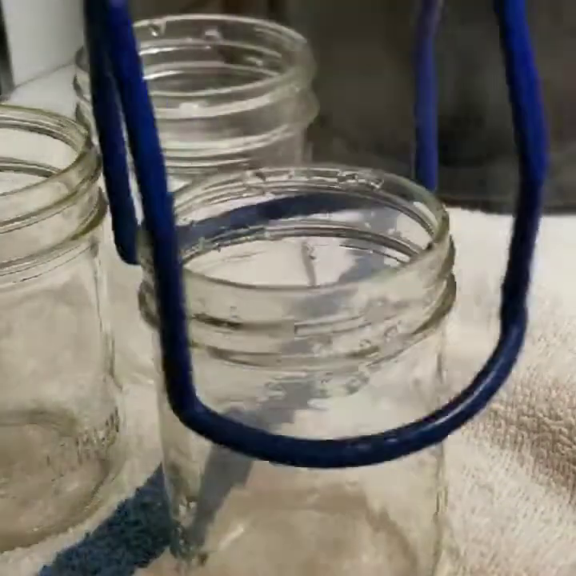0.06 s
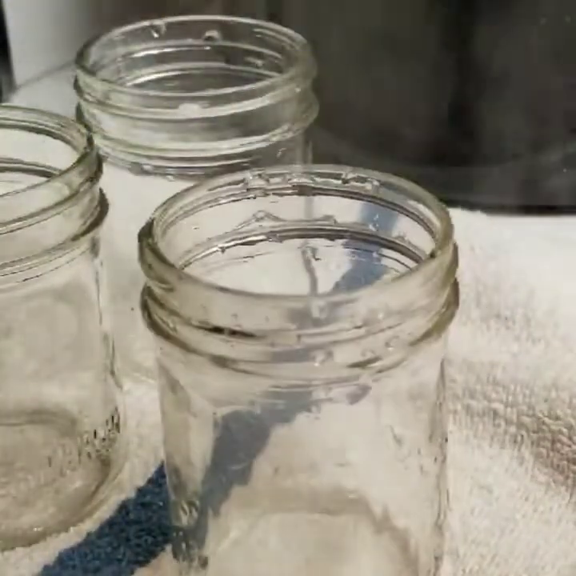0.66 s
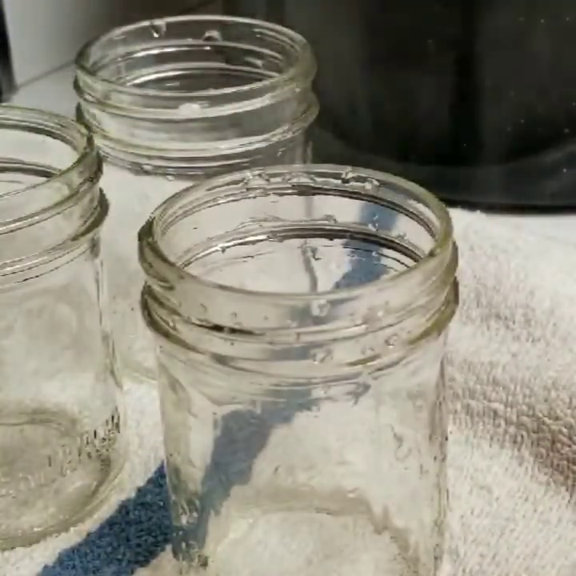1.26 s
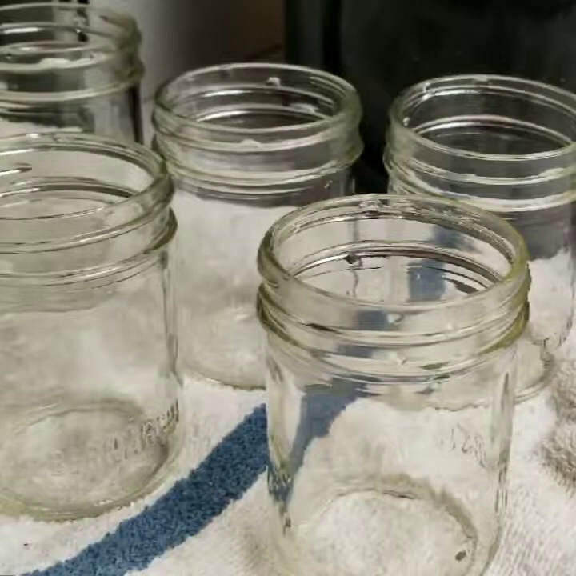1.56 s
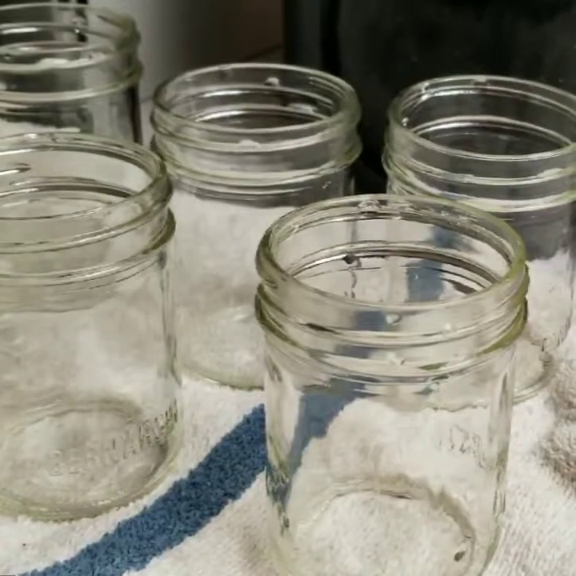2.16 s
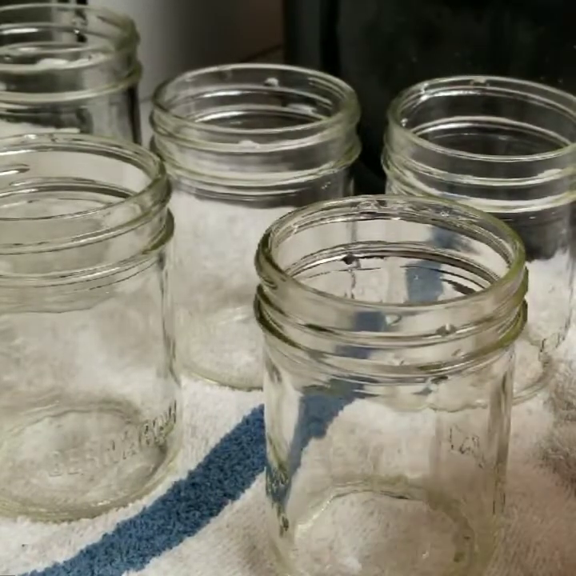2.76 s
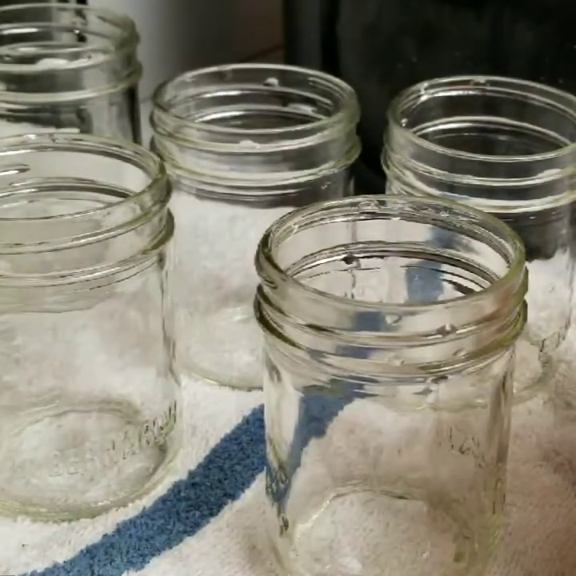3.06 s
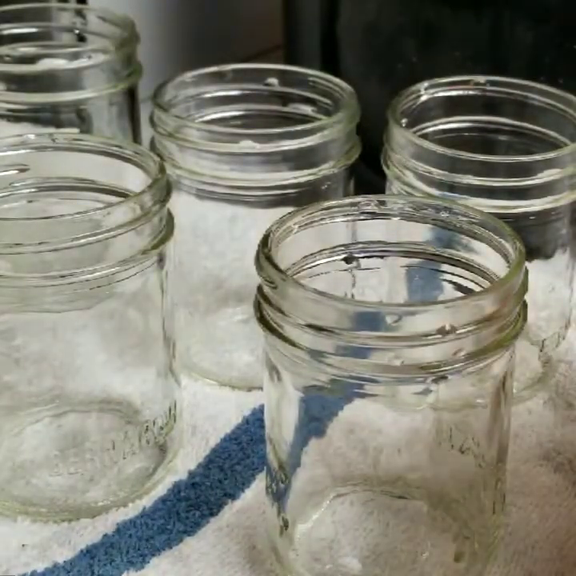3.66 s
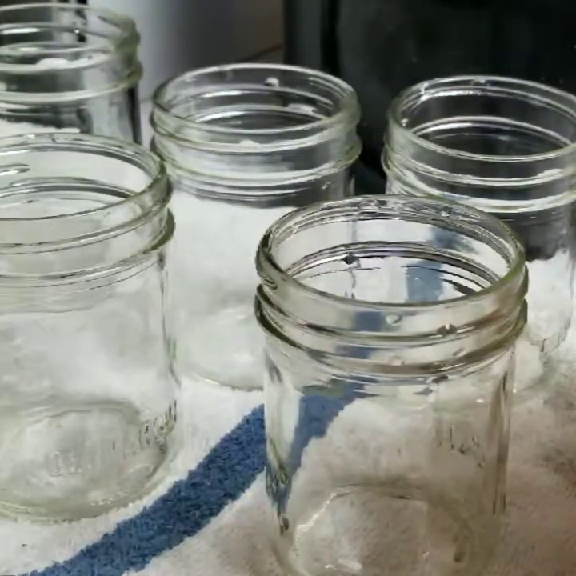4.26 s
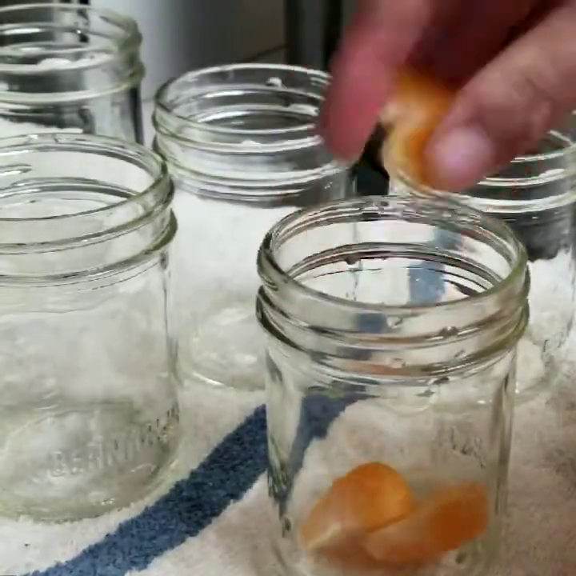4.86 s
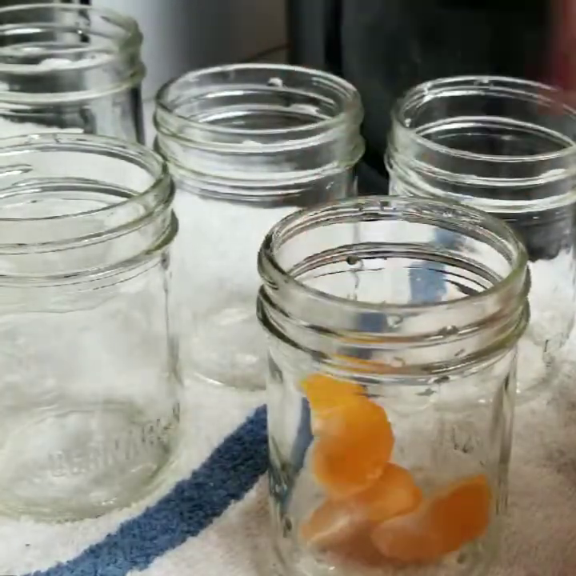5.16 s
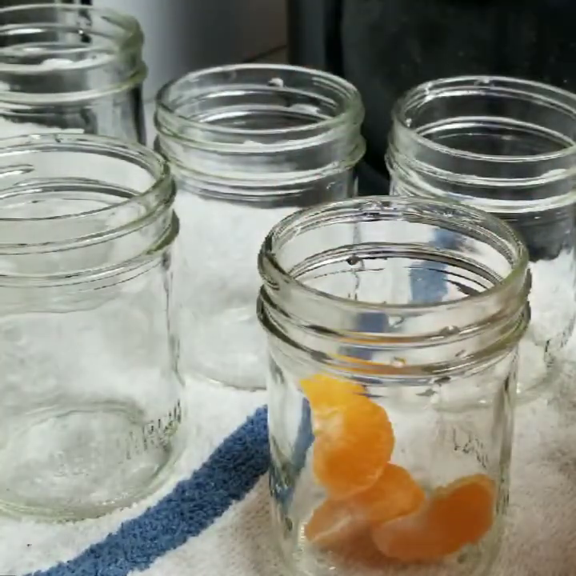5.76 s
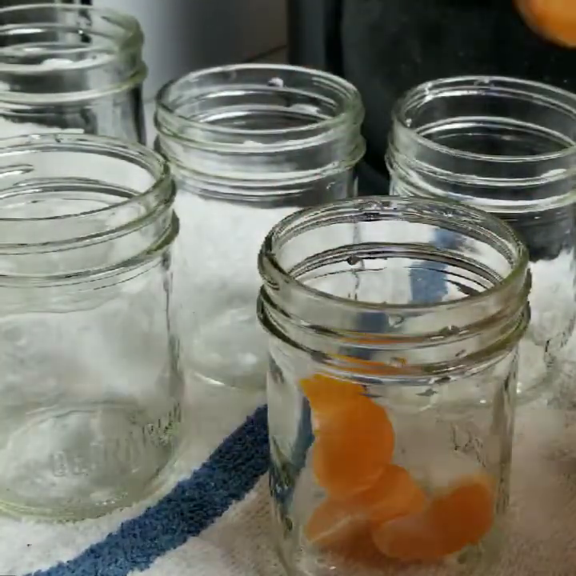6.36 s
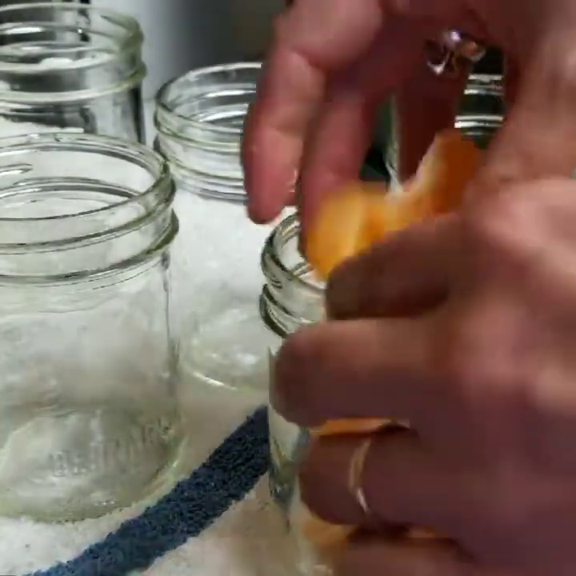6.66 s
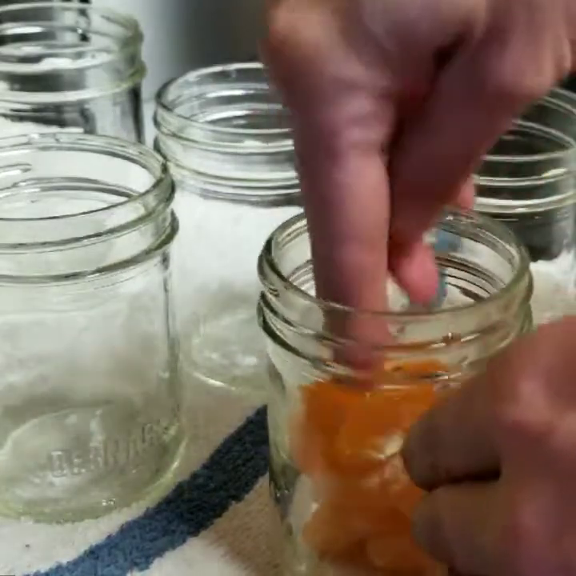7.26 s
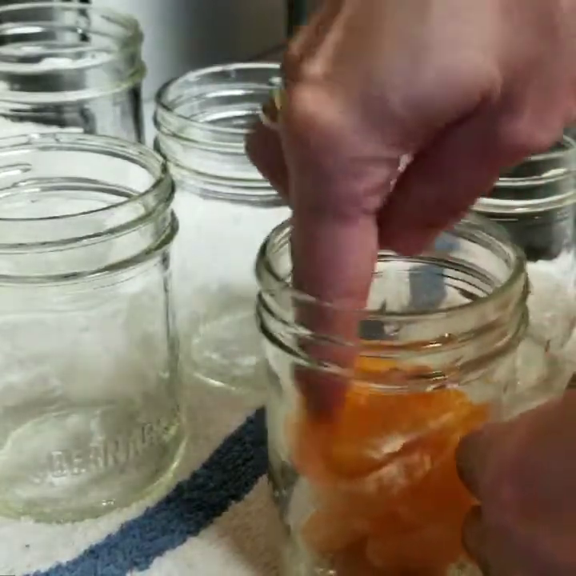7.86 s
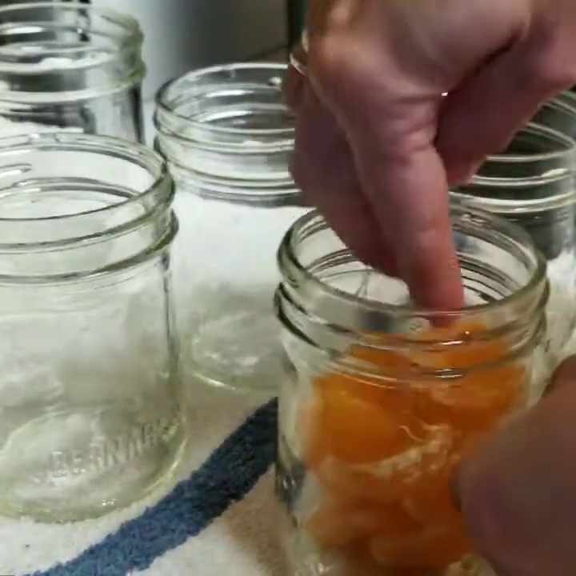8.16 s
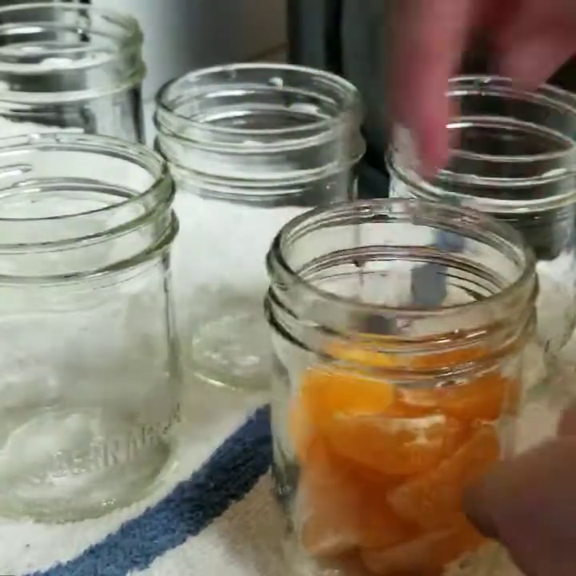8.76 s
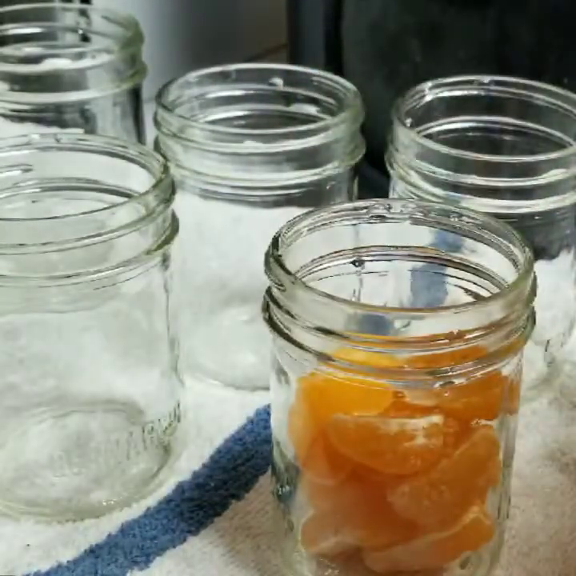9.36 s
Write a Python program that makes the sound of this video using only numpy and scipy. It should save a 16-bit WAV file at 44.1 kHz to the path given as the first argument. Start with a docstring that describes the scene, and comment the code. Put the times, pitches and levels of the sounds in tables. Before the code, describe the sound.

In a small kitchen, a pot boils with a low churning and a few bigger bubbles. Close by, steel tongs click free of a jar, glass ticks, and a quick clatter of ringing metal, worktop thuds and clacking glass makes the loudest moment. The boil continues more softly as juicy fruit pieces plop into a glass jar, then squish and squirt faintly as they are packed in.

```python
"""Water boils in a canning pot in a small kitchen: bubbles, churning, hiss and rumble. A steel jar lifter
snaps off a jar; its rods ring, slide and thud on the worktop. One jar ticks, another clacks and bounces.
Then wet fruit segments are dropped and pressed into a jar close to the microphone: air pockets in the
pulp plop and juice squirts while the pot keeps boiling."""
import sys
import numpy as np
from scipy import signal
from scipy.fft import rfft, irfft, next_fast_len
from scipy.io import wavfile
from scipy.ndimage import map_coordinates

SR = 44100
rng = np.random.default_rng(int(sys.argv[2]) if len(sys.argv) > 2 else 0)


def file_out(sig):
    """Save sig as 16-bit WAV at sys.argv[1]."""
    # one column per channel
    cols = np.atleast_2d(sig).T
    # limit, then scale
    lim = np.clip(cols, -1, 1)
    pcm = np.round(lim * 32767).astype(np.int16)
    wavfile.write(sys.argv[1], SR, pcm)


N = 414981
T = np.arange(SR // 2) / SR  # time within one event, s
SCENE_S = np.arange(N) / SR

# Loudness of the pot: time_s, level_db
BOIL_LEVEL = [(0.0, -49), (1.26, -49.5), (1.54, -53), (2.38, -55), (2.64, -54), (3.11, -59), (4.4, -60),
              (4.9, -54), (9.4, -54)]
# Hollow resonances of the pot: centre_hz, width_hz, lift_db
POT_RESONANCES = [(141.2, 45, 3), (228, 96, 6), (565, 170, 1), (733, 170, 3), (1637, 570, 5.5)]
# Spectra of the boil, from deep rolling to finest hiss: freq_hz, density_db
RUMBLE_SPECTRUM = [(20, -17.5), (50, -8), (90, 0), (200, 1.5), (290, 0), (450, -24), (1500, -71.5)]
BUBBLING_SPECTRUM = [(15, -58), (25, -17), (148, 0), (186, -6), (272, -4), (350, -7.5), (501, -5.5),
                     (584, -7.5), (778, -8.5), (1160, -17), (1490, -16.5), (2140, -20), (2400, -26),
                     (3120, -51.5), (5280, -120)]
HISS_SPECTRUM = [(1200, -25.5), (2000, -13.5), (2400, 2.5), (2900, 3.5), (3600, 1), (5200, 1), (6500, 3.5),
                 (8000, -0.5), (9500, -9.5), (15800, -15)]
FIZZ_SPECTRUM = [(7000, -29.5), (9500, -8.5), (11500, -2), (15800, -0.5)]
# Big bubbles breaking: start_s, pitch_hz, level_db
GULPS = [(.015, 224, -34.5), (.212, 272, -34.5), (0.565, 270, -32), (.875, 325, -39), (1.082, 250, -39),
         (1.237, 415, -36), (1.319, 85, -33.5), (1.415, 175, -29.5)]
# Lifter letting go of the jar: start_s, level_db, tilt_db_per_octave, ring_db
SNAPS = [(0.1919, -25.5, -0.1, -44), (0.24, -47.5, 3, -60), (.721, -37.5, -3, -37)]
# Dry snap: freq_hz, density_db
SNAP_SPECTRUM = [(500, -15.5), (1200, -6.5), (2200, 0.5), (3500, -7.5), (5000, -8.5), (7500, -5),
                 (9500, -16), (11500, -5.5), (15500, -12)]
# Jar mouth: freq_hz, level_db, t60_s
MOUTH_MODES = [(2810, -5, 0.066), (4800, 4, 0.029), (5740, -1, 0.042)]
# Water spitting: start_s, pitch_hz, level_db
SPITS = [(.967, 1000, -44), (1.237, 1410, -40)]
# Squirt of liquid: pitch_ratio, density_db
SQUELCH_SPECTRUM = [(.3, 4), (1, 1), (1.8, -1), (2.6, -20), (8, -28.5)]
# Brief dip in the pot's level: start_s, bottom_s, end_s
DIP = (1.432, 1.503, 1.513)
# Faint tones: start_s, pitch_hz, level_db, length_s
TONES = [(1.52, 755, -45.5, 0.07), (1.787, 44.7, -44, 0.081), (4.723, 2607, -59, 0.052)]
# Bumps on the worktop: start_s, level_db, tilt_db_per_octave, t60_s, bass_db
THUDS = [(1.768, -34, -11, 0.14, 2), (2.528, -23.5, -4.5, 0.09, -1), (2.541, -26, 4, 0.1, 0),
         (2.558, -31, 6, 0.07, 0), (2.6803, -15, -2, 0.04, -12), (2.6885, -16, -1, 0.05, -4),
         (2.6945, -22.5, -1.5, .05, 2), (2.71, -25.5, 3, .035, 2), (2.7185, -18, 0, 0.036, -6),
         (2.7408, -23.5, 1.5, 0.075, -1), (2.753, -31, 5, .05, 0)]
# Worktop contact: freq_hz, density_db
WORKTOP_SPECTRUM = [(35, -49.5), (120, -10.5), (400, -2.5), (500, -14), (700, 3.5), (1100, -12),
                    (1600, -14), (2100, -20), (2800, -22.5), (4500, -34), (12000, -51.5)]
# Hollow worktop and lifter hinge: freq_hz, level_db, base_t60_s
WORKTOP_MODES = [(182, -9, .1), (300, -8, .08), (420, -7, 0.06), (599, -1, 0.055), (715, 3, 0.06),
                 (900, -6, .04)]
HINGE_MODES = [(1353, 2, 0.035), (2810, 0, 0.11), (3280, -3.5, .05)]
# Light ticks on a jar: start_s, level_db, t60_scale, click_db, stirred_hz
TICKS = [(1.831, -19.5, 0.21, -5, 10720), (1.897, -38, 0.45, 0, 7316)]
# Ticked jar: freq_hz, level_db, base_t60_s
RIM_MODES = [(2256, -12, .42), (3472, -1, .13), (4953, -1, .14), (6643, -6, .22), (7316, -4, .16),
             (7940, -2, .16), (10720, 0, .15), (13090, 2, .14), (15540, -3, .08)]
# Steel contacts: start_s, ring_db, relative_click_db, stirred_hz, stirred_hz
STEEL_HITS = [(2.382, -27.5, -29, 7526, 15095), (2.448, -30.5, -28, 7526, 15095),
              (2.475, -32, -35, 7133, 15095), (2.491, -33.5, -42, 7133, 9534),
              (2.506, -36.5, -45, 7133, 15095), (2.54, -33, -32.5, 4694, 11994),
              (2.561, -40, -42, 13440, 13792), (2.689, -39.5, -35, 7526, 13792)]
# Lifter rods: freq_hz, level_db, t60_s
ROD_MODES = [(1787, -8, .45), (4694, -2.5, .38), (7133, -5.5, .45), (7526, 0, .38), (9534, 1, .25),
             (10040, -4, .18), (11251, -6, .24), (11994, 0, .19), (12898, -6, .24), (13440, 0, .14),
             (13792, -1, .18), (15095, 1, .15)]
# Lifter's jointed frame: freq_hz, level_db, base_t60_s
FRAME_MODES = [(597, 4.5, 0.073), (1110, -1.5, 0.06), (2480, -14.5, 0.13), (2958, -2, 0.035),
               (3730, -4.5, 0.06), (4950, 5, 0.028), (5360, 5.5, 0.032), (8130, -2, 0.042)]
# Lifter dragging: start_s, length_s, final_db
SLIDE = (2.485, 0.05, -41.5)
# Jar knocking and bouncing: start_s, level_db, tilt_db_per_octave, body_db, clack_t60_s, stirred_hz
JAR_HITS = [(2.9006, -16, 0.5, 0.5, 0.067, 3440), (2.9245, -13, -1, -3.5, .056, 2320),
            (2.942, -24.5, -4, 1.5, .04, 1400), (2.9555, -20, -3.5, -2, .045, 3400)]
# Crowded, damped modes of glass on its support: freq_hz, density_db
CLACK_SPECTRUM = [(60, -31), (120, -10), (400, -30), (650, -3), (980, -1.5), (1170, -17.5), (1400, -5),
                  (2020, -20), (2300, 6), (2600, -5.5), (3080, -15), (3530, 1), (4200, -28), (4950, -9),
                  (5900, -30), (7250, -11.5), (9300, -30.5), (15500, -25)]
# Bouncing jar: freq_hz, level_db, base_t60_s
JAR_MODES = [(690, -17, .2), (937, -16, .14), (1376, -11, .15), (2283, -5.5, .23), (2360, -13, .15),
             (2416, -10, .17), (2457, -10, .17), (2647, -15, .16), (3369, -11, .16), (3490, -9, .22),
             (3527, -3.5, .32), (3565, -9, .24), (4953, -14, .16), (6675, -23, .16), (7200, -16, .12)]
# Fruit landing or pushed down: start_s, pitch_hz, level_db
PLOPS = [(4.757, 783, -36), (4.879, 493, -31.5), (7.97, 507, -36), (8.127, 276, -33.5), (8.221, 427, -30),
         (8.252, 590, -35), (8.506, 225, -30.5), (8.928, 523, -38.5)]
# Segments squeezed or pulled apart: start_s, pitch_hz, level_db
SQUEEZES = [(5.819, 1010, -49), (6.022, 1013, -41.5), (6.203, 1040, -50.5), (6.444, 950, -41),
            (6.584, 1020, -48), (7.668, 895, -43), (8.354, 1000, -48), (8.442, 1300, -48.5),
            (8.472, 860, -48), (8.611, 800, -48.5)]
# Air pockets in one squeeze: delay_s, pitch_ratio, relative_db
POCKETS = [(0, 1, 2), (.001, 1.75, 2), (.007, 1.6, -4)]
# Room decay: freq_hz, t60_s
KITCHEN_DECAY = [(150, 0.22), (2500, 0.36), (8000, 0.24), (15000, 0.092)]


def amp(db):
    """Decibels to gain."""
    return 10 ** (np.asarray(db) / 20)


def unit(x):
    """Scale to rms 1."""
    return x / np.sqrt(np.mean(x ** 2) + 1e-20)


def along(points, hz):
    """Interpolate (freq_hz, value) points on a log axis."""
    freqs_hz, values = np.transpose(points)
    return np.interp(np.log(hz + 1), np.log(freqs_hz + 1), values)


def fade(t, t60):
    """Free decay of a vibration."""
    return np.exp(-np.log(1000) * t / t60)


def wobble(knots_per_s):
    """Smooth random curve."""
    knots = rng.standard_normal(int(N * knots_per_s / SR) + 4)
    return map_coordinates(knots, [SCENE_S * knots_per_s])


def filtered(x, response):
    """Apply the gain response(hz)."""
    size = next_fast_len(len(x) + 8192)
    return irfft(rfft(x, size) * response(np.fft.rfftfreq(size, 1 / SR)), size)[:len(x)]


def add(track, start_s, sound):
    """Mix a sound into the track."""
    part = track[round(start_s * SR):][:len(sound)]
    part += sound[:len(part)]


def noise(spectrum, samples=N, tilt_db=0):
    """Shaped noise at rms 1, tilted by tilt_db per octave."""
    white = rng.standard_normal(samples)
    return unit(filtered(white, lambda hz: amp(along(spectrum, hz) + tilt_db * np.log2(hz + 20))))


def burst(spectrum, t60_s, rise_s, tilt_db=0):
    """Crowded modes build up and die together; a harder contact tilts them upwards."""
    envelope = fade(T, t60_s) * (1 - np.exp(-T / rise_s))
    return unit(noise(spectrum, len(T), tilt_db) * envelope) * np.sqrt(np.mean(envelope ** 2))


def ring(modes, colour_db=np.zeros_like, t60_scale=1, scatter_db=0):
    """Clear decaying modes, weighted by the contact's colour_db(hz)."""
    hz, db, t60_s = np.transpose(modes)[:, :, None]
    gain = amp(db + colour_db(hz) + scatter_db * rng.standard_normal(hz.shape))
    waves = np.sin(2 * np.pi * (hz * T + rng.random(hz.shape))) * fade(T, t60_s * t60_scale)
    return (gain * waves).sum(0) / np.linalg.norm(gain) * (1 - np.exp(-T / 0.0008))


def stir_db(hz, stirred_hz, lift_db, width_hz=250):
    """The strike point favours some modes."""
    return lift_db * sum(np.exp(-((hz - centre_hz) / width_hz) ** 2) for centre_hz in stirred_hz)


def bubbles(count=2600, centre_hz=470, log_spread=0.77, cycles=13):
    """Vapour bubbles at random times: short damped tones that rise in pitch."""
    when, size_rank = rng.random((count, 2)).T[:, :, None]
    hz = centre_hz * np.exp(log_spread * rng.standard_normal((count, 1)))
    t = T[:1500]
    age = t * hz / cycles
    glide = 1 + 0.07 * np.minimum(age, 1)
    gain = amp(-3 * np.log(0.014 + size_rank)) * np.sqrt(hz)
    envelope = fade(age, 0.93) * (1 - np.exp(-2 * hz * t))
    waves = gain * np.sin(2 * np.pi * hz * t * glide) * envelope
    indices = (when * N).astype(int) + np.arange(len(t))
    return unit(np.bincount(indices.ravel(), waves.ravel(), N)[:N])


def pot_colour(hz):
    """Gain of bubbling water heard through the hollow pot."""
    lift_db = sum(db / (1 + (2 * (hz - centre_hz) / width_hz) ** 2)
                  for centre_hz, width_hz, db in POT_RESONANCES)
    return amp(along(BUBBLING_SPECTRUM, hz) + lift_db)


def boil(steady_db=-54.5, surge_below_hz=450):
    """Bubbles and surging water sound through the pot; fizz, hiss and rumble follow their level."""
    level_db = np.interp(SCENE_S, *np.transpose(BOIL_LEVEL))
    excess_db = level_db - steady_db
    pops = unit(filtered(bubbles(), pot_colour))
    churn = unit(filtered(rng.standard_normal(N), pot_colour))
    water = unit(churn + amp(-4) * pops)
    deep = filtered(water, lambda hz: 1 / (1 + (hz / surge_below_hz) ** 4))
    surge_db = (0.8 + 0.3 * np.maximum(excess_db, 0)) * wobble(22)
    body = (water - deep + deep * amp(surge_db)) * amp(level_db + 0.32)
    fizz, hiss, rumble = noise(FIZZ_SPECTRUM), noise(HISS_SPECTRUM), noise(RUMBLE_SPECTRUM)
    fizz *= amp(-62.5 + np.minimum(excess_db, 0))
    rumble *= amp(-69 + 3.1 * excess_db + 1.6 * wobble(14))
    hiss *= amp(-64 + 0.88 * excess_db + 0.82 * wobble(11))
    return body + fizz + rumble + hiss


def gulps():
    """A big bubble breaks and shakes the water around it."""
    out = np.zeros(N)
    for start_s, hz, db in GULPS:
        bubble = np.sin(2 * np.pi * hz * T * (1 + 3 * T)) * fade(T, 0.039) * (1 - np.exp(-T / 0.002))
        slosh = burst([(hz / 5, -8), (hz, 0), (hz * 4, -16), (hz * 20, -40)], t60_s=0.085, rise_s=0.0062)
        add(out, start_s, amp(db) * (bubble + amp(-1) * slosh))
    return out


def lifter_snaps():
    """The lifter snaps off the jar, whose mouth rings."""
    out = np.zeros(N)
    for start_s, db, tilt_db, ring_db in SNAPS:
        mouth = ring(MOUTH_MODES, scatter_db=2)
        snap = burst(SNAP_SPECTRUM, t60_s=0.047, rise_s=0.0016, tilt_db=tilt_db)
        add(out, start_s, amp(ring_db) * mouth + amp(db) * snap)
    return out


def squelch(hz):
    """A short squirt of liquid."""
    return burst([(ratio * hz, db) for ratio, db in SQUELCH_SPECTRUM], t60_s=0.056, rise_s=0.0022)


def spits():
    """Water spits in the pot."""
    out = np.zeros(N)
    for start_s, hz, db in SPITS:
        add(out, start_s, amp(db) * squelch(hz))
    return out


def level_dip():
    """A gain that drops at once, sinks further and recovers."""
    start_s, bottom_s, end_s = DIP
    return amp(np.interp(SCENE_S, [start_s, start_s + 0.004, bottom_s, end_s], [0, -3.5, -10, 0]))


def faint_tones():
    """Short tones swell and fade."""
    out = np.zeros(N)
    for start_s, hz, db, length_s in TONES:
        swell = np.sin(np.pi * np.minimum(T / length_s, 1))
        add(out, start_s, amp(db) * np.sin(2 * np.pi * hz * T) * swell)
    return out


def lifter_thuds(bass_below_hz=450):
    """The lifter bumps the hollow worktop and its hinge rattles; dull contacts hardly ring either."""
    out = np.zeros(N)
    for start_s, db, tilt_db, t60_s, bass_db in THUDS:
        weight_db = lambda hz: bass_db * (hz < bass_below_hz)
        spectrum = [(hz, density_db + weight_db(hz)) for hz, density_db in WORKTOP_SPECTRUM]
        bump = burst(spectrum, t60_s, rise_s=0.0009, tilt_db=tilt_db)
        knock = ring(WORKTOP_MODES, weight_db, t60_scale=0.9, scatter_db=1.5)
        knock *= amp(0.5 + 2 * min(tilt_db, 0))
        rattle = amp(-20.5 + tilt_db) * ring(HINGE_MODES, t60_scale=0.88)
        add(out, start_s, amp(db) * (bump + knock + rattle))
    return out


def jar_ticks():
    """Light ticks stir a jar's high modes."""
    out = np.zeros(N)
    for start_s, db, t60_scale, click_db, stirred_hz in TICKS:
        ping = ring(RIM_MODES, lambda hz: stir_db(hz, [stirred_hz], lift_db=4.5), t60_scale, scatter_db=2)
        click = burst(SNAP_SPECTRUM, t60_s=0.03, rise_s=0.00075, tilt_db=5.7)
        add(out, start_s, amp(db) * (ping + amp(click_db) * click))
    return out


def lifter_clinks(rest_s=2.568, rest_db=-15):
    """The steel frame clicks; the rods ring until they come to rest and are damped."""
    out = np.zeros(N)
    for start_s, ring_db, click_db, *stirred_hz in STEEL_HITS:
        rods = ring(ROD_MODES, lambda hz: stir_db(hz, stirred_hz, lift_db=12), scatter_db=3.5)
        damping = amp(np.interp(start_s + T, [rest_s, rest_s + 0.01], [0, rest_db])) * (start_s < rest_s)
        click = ring(FRAME_MODES, t60_scale=0.75, scatter_db=3)
        click += amp(-6) * burst(SNAP_SPECTRUM, t60_s=0.046, rise_s=0.0014, tilt_db=0.92)
        add(out, start_s, amp(ring_db) * rods * damping + amp(click_db + 5.5) * click)
    return out


def lifter_slide():
    """The lifter drags on the worktop with growing pressure."""
    out = np.zeros(N)
    start_s, length_s, final_db = SLIDE
    pressure = (T / length_s) * (T < length_s)
    friction = burst(WORKTOP_SPECTRUM, t60_s=np.inf, rise_s=0.001, tilt_db=8.6)
    add(out, start_s, amp(final_db) * pressure * friction)
    return out


def jar_bounce(body_below_hz=1200):
    """Heavy blows stir a jar's low modes; a towel shortens the ring."""
    out = np.zeros(N)
    for start_s, db, tilt_db, body_db, t60_s, stirred_hz in JAR_HITS:
        colour_db = lambda hz: body_db * (hz < body_below_hz) + stir_db(hz, [stirred_hz], lift_db=4.5)
        tilted_db = lambda hz: colour_db(hz) + tilt_db * np.log2(hz)
        spectrum = [(hz, density_db + colour_db(hz)) for hz, density_db in CLACK_SPECTRUM]
        clack = burst(spectrum, t60_s, rise_s=0.0016, tilt_db=tilt_db)
        clink = ring(JAR_MODES, tilted_db, t60_scale=0.46, scatter_db=1.5)
        add(out, start_s, amp(db) * (amp(1) * clack + amp(-1.5) * clink))
    return out


def plop(hz, t60_s):
    """An air pocket in wet pulp rings briefly."""
    return np.sin(2 * np.pi * hz * T) * fade(T, t60_s) * (1 - np.exp(-2 * hz * T))


def fruit_drops(juice_db=-8.5):
    """A landing segment plops and squirts juice."""
    out = np.zeros(N)
    for start_s, hz, db in PLOPS:
        add(out, start_s, amp(db) * (plop(hz, t60_s=0.024) + amp(juice_db) * squelch(hz)))
    return out


def fruit_squeezes(juice_db=-5):
    """A squeezed segment squelches and pops small air pockets."""
    out = np.zeros(N)
    for start_s, hz, db in SQUEEZES:
        add(out, start_s, amp(db + juice_db) * squelch(hz))
        for delay_s, ratio, pocket_db in POCKETS:
            add(out, start_s + delay_s, amp(db + pocket_db) * plop(ratio * hz, t60_s=0.02))
    return out


def kitchen_reverb(x, predelay_s=0.005):
    """The room's short tail; the top treble dies first."""
    hz, t, spectra = signal.stft(rng.standard_normal(len(T)), SR, nperseg=256)
    decay = fade(t, along(KITCHEN_DECAY, hz)[:, None])
    _, tail = signal.istft(spectra * decay, SR, nperseg=256)
    tail = np.pad(tail, (round(predelay_s * SR), 0))
    return signal.fftconvolve(x, tail / np.linalg.norm(tail))[:N]


def scene():
    """Close handling noises in the room, over the boiling pot; mono."""
    jars = jar_ticks() + jar_bounce()
    lifter = lifter_snaps() + lifter_clinks() + lifter_slide() + lifter_thuds()
    near = jars + lifter + fruit_drops() + fruit_squeezes() + faint_tones()
    room = amp(-14) * kitchen_reverb(near)
    pot = level_dip() * (boil() + gulps() + spits())
    return (near + room + pot)[None]


def record(dry):
    """The microphone loses the deepest bass; the recorder cuts off the top treble."""
    low_cut_hz, top_hz = 27, 15850
    response = lambda hz: hz ** 2 / np.hypot(hz ** 2, low_cut_hz ** 2) * (hz < top_hz)
    return np.array([filtered(channel, response) for channel in dry])


dry = scene()
out = record(dry)
file_out(out)
```